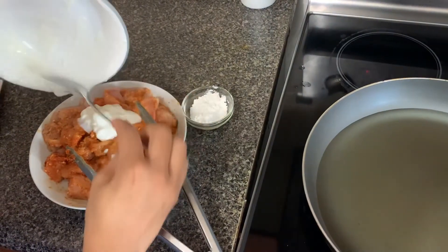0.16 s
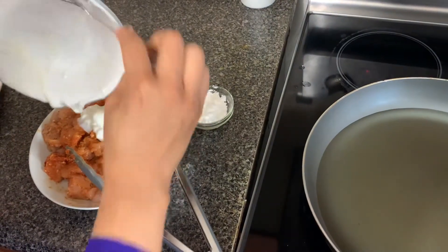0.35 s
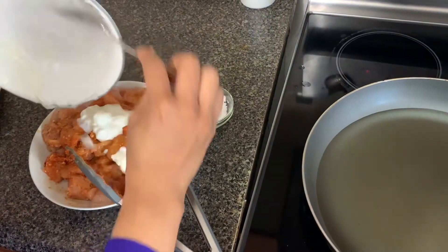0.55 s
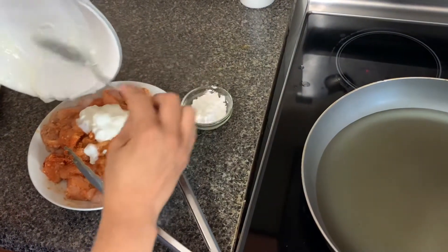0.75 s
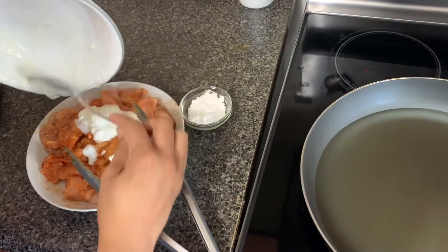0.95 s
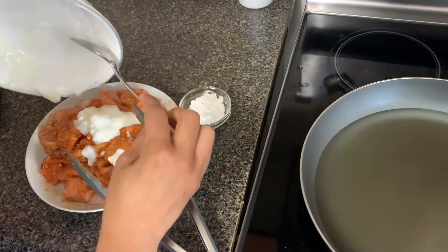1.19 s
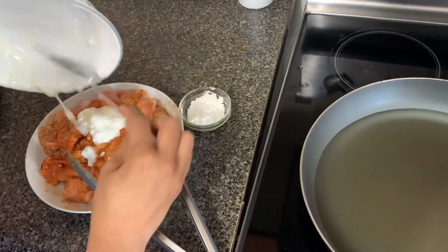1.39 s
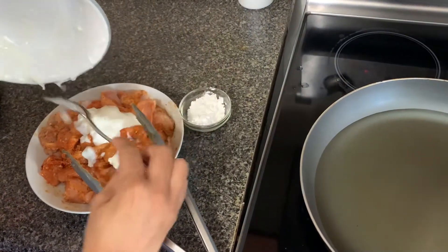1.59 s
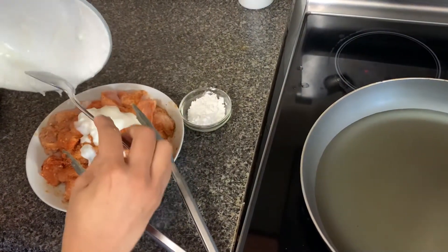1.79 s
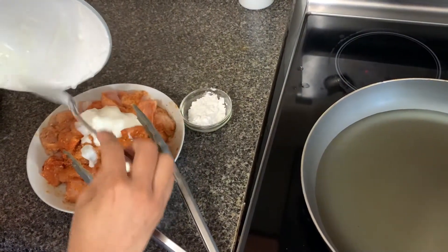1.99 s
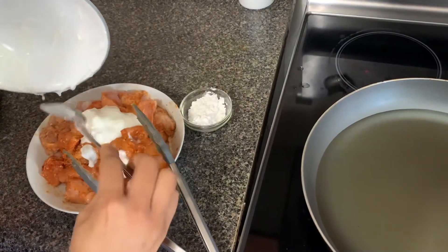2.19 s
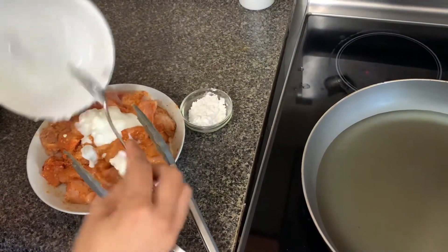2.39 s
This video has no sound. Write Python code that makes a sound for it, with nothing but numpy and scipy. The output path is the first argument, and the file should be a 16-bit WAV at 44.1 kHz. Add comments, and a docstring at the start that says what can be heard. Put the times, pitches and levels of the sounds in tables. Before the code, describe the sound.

Steel utensil taps a glazed bowl in three bright clinks, scraping softly inside, in a quiet kitchen

```python
"""A small hard kitchen, with a phone's two microphone ports close to a hand-held ceramic bowl.
A steel spoon taps the glazed rim on three visits: ringing modes, a noise clatter and a low thud.
Inside, it knocks the wall and scrapes soft food: friction grains drive damped modes, and one moving
tone, a sine of rough pitch, gives a lingering ring and rubbing tones.
Behind it lies a low steady rumble, made of coloured noise and a narrow drone."""
import sys
import numpy as np
from scipy import signal
from scipy.fft import rfft, irfft, next_fast_len
from scipy.io import wavfile
from scipy.ndimage import uniform_filter1d, map_coordinates

SR = 44100
rng = np.random.default_rng(int(sys.argv[2]) if len(sys.argv) > 2 else 0)


def digitize_waveform(pressure):
    """Quantize a signal to 16-bit integers and store it at the path in sys.argv[1].

    Rows of a 2-D input are taken as channels; values are limited to [-1, 1].
    """
    field = np.atleast_2d(pressure).T
    bounded = np.clip(field, -1, 1)
    quanta = np.round(bounded * 32767).astype(np.int16)
    wavfile.write(sys.argv[1], SR, quanta)


N = 108045


def amp(db):
    """dB to gain."""
    return 10 ** (np.asarray(db) / 20)


def unit(x):
    """Scaled to rms 1."""
    return x / np.sqrt(np.mean(x ** 2) + 1e-20)


def along(points, hz):
    """(Hz, value) points interpolated on a log frequency axis."""
    f, v = np.transpose(points)
    return np.interp(np.log(hz + 1), np.log(f + 1), v)


def curves(rows):
    """One value per sample for each column after the time."""
    s, *cols = np.transpose(rows)
    return [np.interp(np.arange(N) / SR, s, c) for c in cols]


def wobble(rate, size=N):
    """A smooth random curve, rate knots a second."""
    knots = rng.standard_normal(int(size * rate / SR) + 4)
    return map_coordinates(knots, [np.arange(size) * rate / SR])


def filtered(x, response):
    """x times a complex response of frequency, padded so that the end does not wrap round."""
    m = next_fast_len(N + SR // 2)
    return irfft(rfft(x, m) * response(np.fft.rfftfreq(m, 1 / SR)), m)[..., :N]


def half_angle(alike, hz):
    """Mid-side mixing angle that gives two channels the listed likeness."""
    return np.arccos(np.clip(along(alike, hz), -1, 1)) / 2


# colour of the kitchen's background noise: f/Hz, relative level/dB per Hz
AIR_COLOUR = [(12, -37.5), (20, -20.5), (65, -8), (158, -15.5), (216, -7), (285, -14.5), (388, -13),
              (446, -21.5), (718, -17.5), (923, -22.5), (1290, -26), (2080, -31), (16000, -73)]
# likeness of the background at the two microphone ports: f/Hz, left-right correlation
AIR_LIKENESS = [(30, 0.69), (120, .88), (300, .7), (1000, 0.35), (5000, 0.16)]
AIR_DB = -57.5  # rms level
DRONE_HZ, DRONE_WIDTH_HZ, DRONE_DB = 210, 9.1, -69


def air():
    """Steady room noise, partly alike in both channels, with a narrow drone of wavering level."""
    z = signal.stft(rng.standard_normal((2, N)), nperseg=512)[2]
    field = uniform_filter1d(rng.standard_normal(z.shape[1:]), 4, 0)
    field = uniform_filter1d(field, 10, 1)
    flutter = amp(0.25 * unit(field))  # shared by both channels
    pair = signal.istft(z * flutter, nperseg=512)[1][:, :N]

    def mid_side(hz):
        angle = half_angle(AIR_LIKENESS, hz)
        return amp(along(AIR_COLOUR, hz)) * (hz > 18) * [np.cos(angle), np.sin(angle)]

    mid, side = filtered(pair, mid_side)
    noise = amp(AIR_DB) * unit(np.array([mid + side, mid - side]))
    band = lambda hz: np.exp(-((hz - DRONE_HZ) / DRONE_WIDTH_HZ) ** 2)
    drone = unit(filtered(rng.standard_normal(N), band))
    return noise + amp(DRONE_DB + 2 * wobble(13)) * drone


# how fast the kitchen's tail dies: f/Hz, t60/s
ROOM_DECAY = [(200, 0.38), (1500, 0.39), (4000, 0.4), (8500, 0.24), (11000, 0.2), (14500, 0.13)]
# likeness of the tail between left and right: f/Hz, left-right correlation
ROOM_LIKENESS = [(200, 1), (800, 0.16), (5000, 0.061), (7500, 0.99), (16000, 1)]
ROOM_DB, ROOM_DELAY_S = -9, .003


def room(x):
    """A fresh stereo tail of the kitchen; each frequency dies at its own speed."""
    hz, t, z = signal.stft(rng.standard_normal((2, SR // 2)), SR, nperseg=256)
    angle = half_angle(ROOM_LIKENESS, hz)[:, None]
    sides = np.array([1, -1])[:, None, None]
    z = np.cos(angle) * z[0] + np.sin(angle) * z[1] * sides
    decay = amp(-60 * t / along(ROOM_DECAY, hz)[:, None])
    tail = signal.istft(z * decay, SR, nperseg=256)[1]
    tail = tail / np.linalg.norm(tail[0])
    late = np.pad(x, (round(ROOM_DELAY_S * SR), 0))[None]
    return amp(ROOM_DB) * signal.fftconvolve(late, tail, axes=1)[:, :len(x)]


# the two ports in the phone's body: f/Hz, phase by which left leads right/rad
PORT_LEAD = [(0, 0), (1000, 1.2), (1700, 2.2), (2900, 1.9), (3900, -1.3), (5600, -1.3), (6400, 0),
             (8500, -3.1), (11000, -6.3), (13300, -9.4), (17000, -14.3)]


def placed(x):
    """The close sound and its tail reach the two ports with different phases."""
    def lead(hz):
        return np.exp(.5j * np.interp(hz, *np.transpose(PORT_LEAD)) * np.array([[1], [-1]]))
    return filtered(x + room(x), lead)


# noise colour of steel on the bowl: f/Hz, relative level/dB per Hz
CLATTER_COLOUR = [(120, -62), (300, -15), (1000, -11), (2000, -4.5), (2900, 1), (3500, -6.5), (4600, -3.5),
                  (5600, -4.5), (6500, 1.5), (7500, -3.5), (8600, -1), (9500, -11), (11000, -6),
                  (12200, -3.5), (14000, -8.5), (15400, -18), (16500, -32)]


def clatter_db(hz):
    """Colour of the broadband noise of a contact, in dB."""
    return along(CLATTER_COLOUR, hz)


FAVOUR_DB, FAVOUR_OCTAVES = 4, 0.26


def favour(hz, spot_hz):
    """dB by which a contact lifts frequencies near the pitch that its spot favours."""
    return FAVOUR_DB * np.exp(-(np.log2((hz + 1) / spot_hz) / FAVOUR_OCTAVES) ** 2)


# one moving tone: a held ring near 4850 Hz at .34-.54 s, and rubbing tones whose pitch rises and falls:
# t/s, f/Hz, level/dB before wavering
TONE_PATH = [(0, 3660, -56), (.1, 3660, -73), (.14, 3740, -97.5), (.34, 5000, -97), (.39, 4950, -51),
             (.46, 4888, -43), (.54, 4780, -65), (.635, 4380, -67.5), (.665, 4440, -56), (.7, 4220, -57),
             (.745, 4000, -67.5), (.76, 3825, -59.5), (.79, 3560, -88.5), (.835, 3310, -69.5),
             (.86, 3415, -58), (.92, 3128, -91), (1.37, 3860, -92.5), (1.405, 3820, -55.5),
             (1.435, 3810, -57), (1.47, 3780, -94.5)]
TONE_ROUGH = .011  # share of the pitch that scales its wobble


def moving_tone():
    """A wavering tone, partly a lingering ring and partly rubbing, rough in pitch and uneven in level."""
    hz, db = curves(TONE_PATH)
    level = amp(db + 4.7 * wobble(60))
    rough_hz = hz * (1 + TONE_ROUGH * wobble(340))
    return level * np.sin(2 * np.pi * np.cumsum(rough_hz) / SR)


# the spoon rubbing along the wall: t/s, relative level/dB, favoured f/Hz
SCRAPE_PATH = [(0, -50.5, 3580), (.04, -76, 3560), (.14, -94, 3700), (.38, -68.5, 4720), (.46, -53, 4830),
               (.52, -54, 1690), (.58, -65.5, 1490), (.65, -52.5, 1930), (.72, -74.5, 2990),
               (.8, -70.5, 7000), (.87, -66, 6900), (.95, -91, 7000), (1.3, -85.5, 6120),
               (1.37, -61.5, 5000), (1.405, -52, 4326), (1.44, -56.5, 2300), (1.49, -91, 2330)]
# modes of the damped wall: f/Hz
WALL_HZ = [1200, 1870, 2090, 2290, 2550, 3950, 4700, 4845, 5380, 6850, 10260, 12190, 14200]
# the same modes, struck: relative level/dB, t60/s
WALL_MODES = [(-0.5, .035), (-13.5, 0.049), (-6.5, 0.087), (-5, 0.035), (-3, 0.084), (-9, .035),
              (-9.5, 0.18), (-4.5, 0.11), (-16, 0.14), (-10.5, 0.089), (-12, 0.029), (-10.5, 0.046),
              (-9.5, .05)]
GRAINS_PER_S, GRAIN_SPREAD_DB, UNEVEN_DB = 2500, 2, 3
SCRAPE_RING_DB, SCRAPE_HISS_DB = 19.5, -9
SMEAR = 4.2  # friction widens each mode by this factor
DRIFT_DB, DRIFT_PER_S = 4, 20  # each mode swells and fades as the sliding contact moves


def scrape():
    """Random grains of friction excite the wall's widened modes unevenly as the contact moves."""
    level_db, spot_hz = curves(SCRAPE_PATH)
    hits = rng.random(N) < GRAINS_PER_S / SR
    sizes = amp(GRAIN_SPREAD_DB * rng.exponential(size=N))
    grains = unit(hits * sizes * rng.standard_normal(N))
    grains = grains * amp(level_db + UNEVEN_DB * wobble(28.84))

    mode_hz = np.array(WALL_HZ)[:, None]
    level, t60 = np.transpose(WALL_MODES)[:, :, None]
    width_hz = SMEAR * np.log(1000) / np.pi / t60
    drift_db = DRIFT_DB * np.array([wobble(DRIFT_PER_S) for _ in WALL_MODES])
    drive_db = SCRAPE_RING_DB + level + favour(mode_hz, spot_hz) + drift_db

    def resonance(f):
        damping = 1j * f * width_hz
        return damping / (mode_hz ** 2 - f * f + damping)

    ringing = filtered(amp(drive_db) * grains, resonance)
    # neighbouring modes move in opposite senses
    rub = ringing[::2].sum(axis=0) - ringing[1::2].sum(axis=0)
    hiss = filtered(grains, lambda f: amp(SCRAPE_HISS_DB + clatter_db(f)))
    return rub + hiss


# corners of a contact's tone: bass gain below, treble gain above: f/Hz
SHELF_HZ = [1976.5, 3170, 6870, 8460]
CRACK_DB, CRACK_S = 0.5, 0.03  # relative level, t60
THUD_DB, THUD_HZ, THUD_S = -18, 275.8, 0.021  # relative level, pitch, t60
MODE_SCATTER_DB, WAVER_RAD, WAVER_PER_S = 2, 1.1, 120


def blows(events, modes_hz, modes):
    """Each blow rings the modes anew with a wavering phase, clatters and thuds."""
    out, t = np.zeros(N + SR), np.arange(SR // 3) / SR
    hz = np.array(modes_hz)[:, None]
    level, t60 = np.transpose(modes)[:, :, None]
    f = np.fft.rfftfreq(len(t), 1 / SR)
    rise = 1 - np.exp(-t / 0.00051)
    for s, db, bass_db, treble_db, ring_db, spot_hz in events:
        def tone_db(c):
            return np.interp(c, SHELF_HZ, [bass_db, 0, 0, treble_db]) + favour(c, spot_hz)

        gain_db = level + tone_db(hz) + MODE_SCATTER_DB * rng.standard_normal(hz.shape)
        waver = WAVER_RAD * np.array([wobble(WAVER_PER_S, size=len(t)) for _ in modes])
        phase = 2 * np.pi * hz * t + waver - waver[:, :1]  # starts at zero
        ring = np.sum(amp(gain_db - 60 * t / t60) * np.sin(phase), axis=0)
        ring = ring / np.linalg.norm(amp(level))

        colour = amp(clatter_db(f) + tone_db(f))
        noise = unit(irfft(rfft(rng.standard_normal(len(t))) * colour, len(t)))
        tone_gain = np.linalg.norm(colour) / np.linalg.norm(amp(clatter_db(f)))
        crack = amp(CRACK_DB - 60 * t / CRACK_S) * noise * tone_gain

        thud = amp(THUD_DB + bass_db - 60 * t / THUD_S) * np.sin(2 * np.pi * THUD_HZ * t)
        blow = amp(ring_db) * (ring + thud) + crack
        out[round(s * SR):][:len(t)] += .5 * amp(db) * rise * blow
    return out[:N]


# knocks of the spoon inside the bowl:
# t/s, relative level/dB, bass/dB, treble/dB, ringing/dB, favoured f/Hz
WALL_KNOCKS = [(.3326, -9.5, 0, 7, 0, 4500), (.5010, -44, 12.5, 15, 10.5, 5500),
               (.6005, -27, 5, -3.5, -5.5, 3880), (.8375, -42, 3.5, 7.5, -9.5, 6800),
               (1.3823, -51.5, -3, -17, 11, 4710), (1.5778, -49.5, -14, 19.5, -25, 8200)]


def knocks():
    """The spoon strikes the damped wall, which rings in its own modes."""
    return blows(WALL_KNOCKS, WALL_HZ, WALL_MODES)


# taps on the rim: t/s, relative level/dB, bass/dB, treble/dB, ringing/dB
RIM_TAPS = [(0.2325, -30.5, 2.5, -32.5, -11), (0.2407, -21.5, -3.5, -26, -12),
            (0.243, -13, -12.5, -31.5, -10.5), (0.2492, -7.5, -6.5, -15, -8), (0.2496, -7.5, 2.5, 7, -11.5),
            (0.2541, -6.5, 0, 4.5, -5), (.2575, -9.5, 1, -8, -8), (1.0708, -20.5, -8, -26.5, -1),
            (1.0766, -7, -1.5, 2, -2), (1.079, -11.5, 6.5, 4.5, 2), (1.0850, -12.5, 2, -6.5, 3),
            (1.09, -16.5, -2, -3, 4), (1.811, -37, -7, -32.5, 8.5), (1.8201, -21.5, -12.5, -23.5, -1),
            (1.8232, -6, -2, 3.5, -1), (1.8271, -12, -1, -1.5, -5.5), (1.8290, -9.5, -1, -5, -7.5),
            (1.8350, -21.5, 0, -0.5, -4.5), (1.9739, -45.5, 2.5, -23, 9)]
# modes of the glazed rim: f/Hz
RIM_HZ = [650, 1480, 2130, 2840, 2915, 4345, 4490, 4600, 4800, 6395, 6740, 10300, 10925, 11890, 13400,
          15070]
# the same modes, struck: relative level/dB, t60/s
RIM_MODES = [(-9.5, 0.043), (3.5, 0.0091), (-10.5, 0.067), (-7.5, 0.27), (-15, .07), (-7.5, 0.11),
             (-7, 0.17), (-7.5, 0.1), (-7.5, 0.056), (0, 0.051), (-5, 0.088), (-0.5, 0.071), (0.5, 0.061),
             (-2, 0.035), (-4.5, 0.038), (-13.5, 0.066)]
# where the spot struck on each visit rings best: f/Hz
VISIT_FAVOURS_HZ = [5060, 4600, 4414]


def rim_taps():
    """Three visits of the spoon to the ringing rim, each with its own spot and its own room tail."""
    visits = []
    for start_s, spot_hz in zip((0, .8, 1.6), VISIT_FAVOURS_HZ):
        taps = [(*tap, spot_hz) for tap in RIM_TAPS if start_s <= tap[0] < start_s + .8]
        visits.append(placed(blows(taps, RIM_HZ, RIM_MODES)))
    return sum(visits)


def scene():
    """The kitchen's air, the work inside the bowl, and the taps on its rim."""
    return air() + placed(scrape() + moving_tone()) + placed(knocks()) + rim_taps()


TOP_HZ = 16750


def record(dry):
    """The phone keeps nothing above its band limit."""
    return filtered(dry, lambda hz: hz < TOP_HZ)


dry = scene()
out = record(dry)
digitize_waveform(out)
```